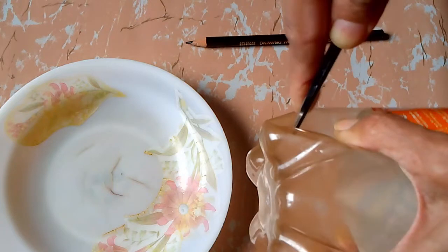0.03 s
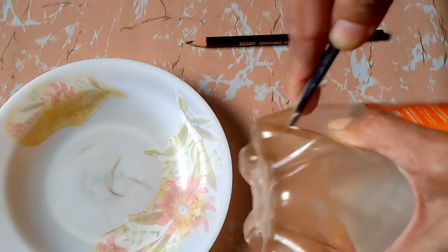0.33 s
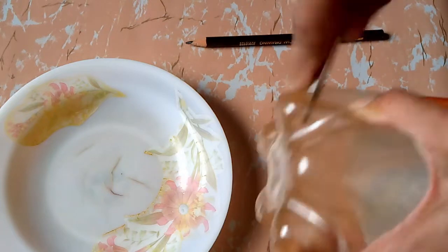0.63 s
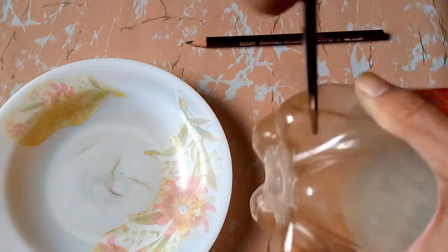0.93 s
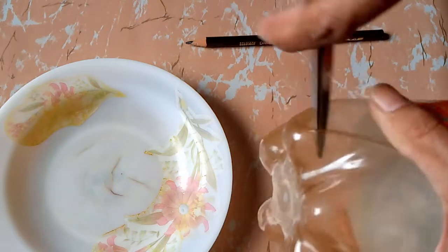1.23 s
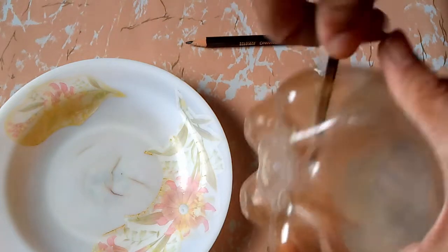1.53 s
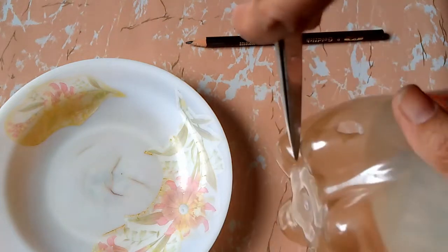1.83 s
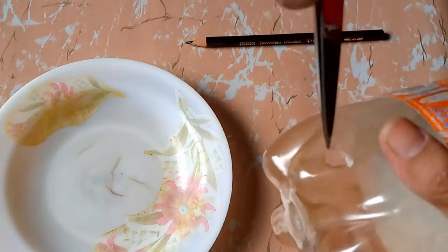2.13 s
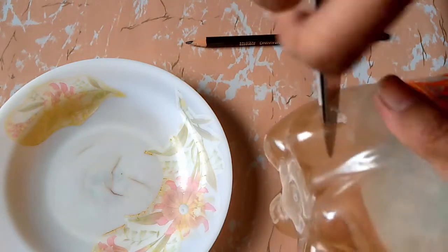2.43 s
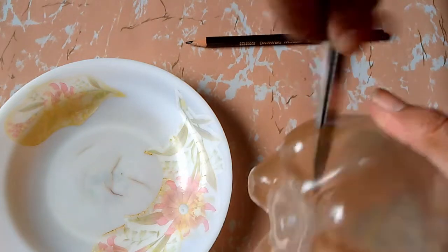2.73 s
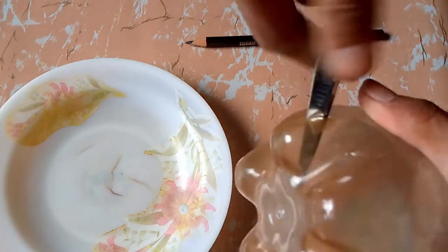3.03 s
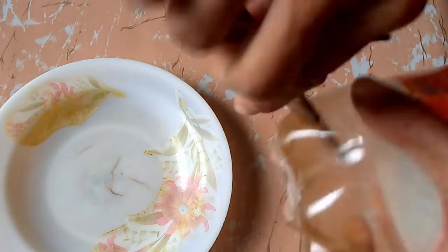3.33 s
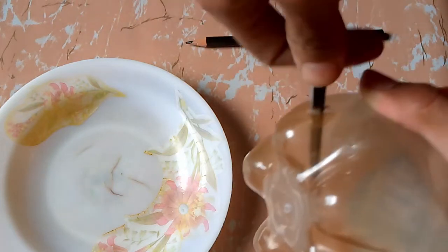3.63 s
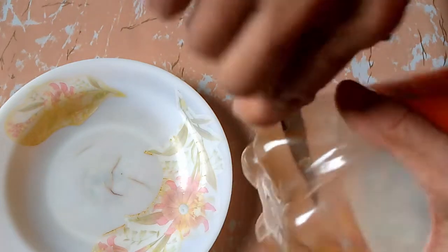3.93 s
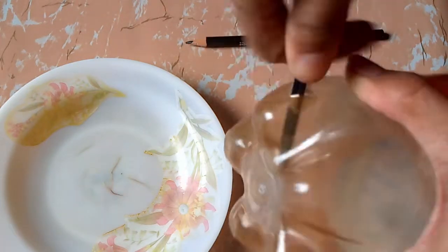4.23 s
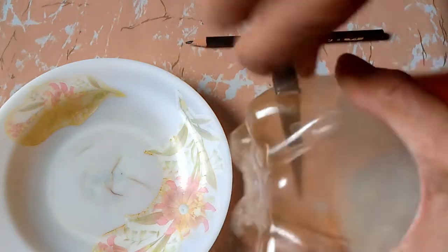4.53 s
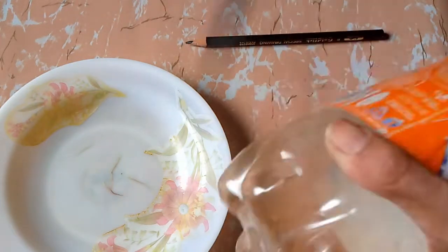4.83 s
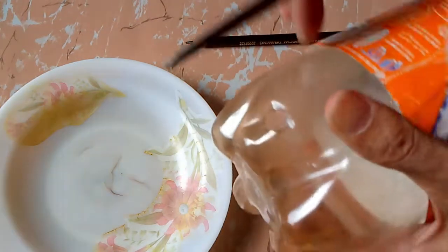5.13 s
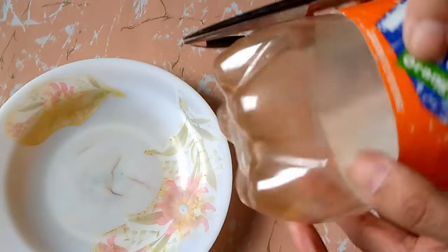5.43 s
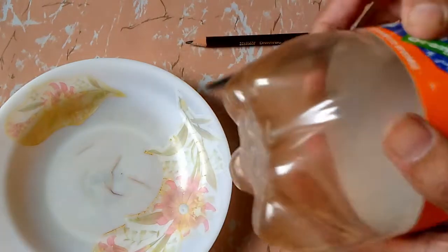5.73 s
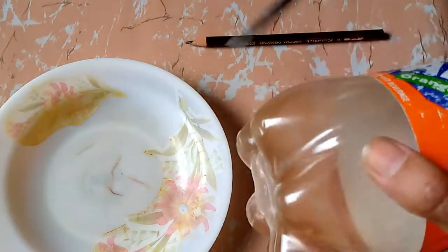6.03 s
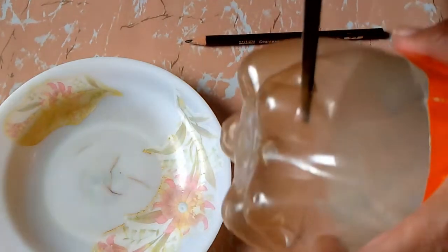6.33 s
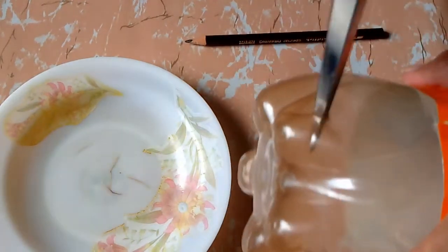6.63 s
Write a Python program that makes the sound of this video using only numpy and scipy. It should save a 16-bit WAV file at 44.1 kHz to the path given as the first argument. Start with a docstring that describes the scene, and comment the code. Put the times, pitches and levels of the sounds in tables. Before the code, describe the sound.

Small scissors work into a thin plastic bottle, close up in a small room with a little echo and a quiet hush. At about 0.5 and 0.9 seconds the point breaks through with loud snaps and hollow pops, with smaller cracks between. A rising scrape ends in two more snaps around 1.5 seconds. From 1.8 to 3 seconds the blade rubs more softly, with tiny squeaks, dull finger bumps and one firmer push near 2.8. From about 3.2 to 4.8 seconds it twists to and fro in the hole, giving roughly five short rasps mixed with clicks and knocks. After 5 seconds things are quieter: the bottle crinkles as it is turned and the free blades tick lightly. A faint, distant whine rises from about 5.5 seconds. A small pop comes at 6.2, the sound drops out briefly at 6.3, and a last crinkle and knock follow.

```python
"""In a small room, over a table, small scissors are worked into a thin plastic bottle.
The point breaks through with a few loud snaps, then the blades twist and scrape in the hole.
Snaps and scrapes shake the air inside, the wall, the crackling skin and the cut edge.
Panels pop, fingers bump, and the free blades tick, mostly near the end. Behind it all are a quiet
hush and, late on, a faint far-off whine. Just before the end the sound drops out briefly."""
import sys
import numpy as np
from scipy import signal
from scipy.fft import rfft, irfft, next_fast_len
from scipy.io import wavfile
from scipy.ndimage import uniform_filter1d

SR = 44100
rng = np.random.default_rng(int(sys.argv[2]) if len(sys.argv) > 2 else 0)


def inscribe(sig):
    """Save sig as 16-bit PCM at rate SR to the path in sys.argv[1].

    A 1-D sig is mono; a 2-D sig holds one channel per row.
    Samples are clipped to [-1, 1] before scaling.
    """
    pcm = np.round(np.clip(np.atleast_2d(sig).T, -1, 1) * 32767)
    wavfile.write(sys.argv[1], SR, pcm.astype(np.int16))


N = 294147
TIME = np.arange(N) / SR
RING = round(.25 * SR)   # samples given to one hit

# The air in the bottle and its slowest flexing.
# Each row: pitch in Hz, level in dB, fade time (t60: seconds to fall by 60 dB).
CAVITY = [(128, -9, 0.037), (165, -3, 0.056), (208.2, -2.5, 0.16), (225, -2, 0.02), (271, -6.5, 0.096)]
# The tone of the crackling skin and bright cut edge. Each row: frequency in Hz, level in dB.
SKIN = [(600, -14), (1100, -2.5), (1350, 0), (1600, -1.5), (1870, 2), (2250, -2), (2640, 1), (3100, -4),
        (3650, -9), (4200, -14), (5500, -20.5), (9000, -37.5), (16000, -54.5)]
EDGE = [(2000, -21.5), (3600, -3), (4400, 2), (5400, 0.5), (6600, 4), (7600, -5.5), (9000, -5.5),
        (10500, -20.5), (13000, -32.5), (15100, -13), (16500, -24.5)]   # the dip at 13 kHz and the peak near 15 kHz are the microphone's colour


def snaps(catch_sharp_db=-13.5):
    """The plastic buckles or tears, or the blade catches in the hole: all four bottle parts ring."""
    # Each row: start in seconds, level in dB, sharpness (edge over wall) in dB, wall pitch in Hz.
    tears = [(0.307, -69, 17.5, 790), (0.323, -60.5, -1, 890), (0.473, -68, 15, 780),
             (0.4982, -26.5, -6, 798), (0.6376, -72, 9, 790), (0.694, -76, 17.5, 780), (.746, -65, 1, 783),
             (0.793, -27.5, -22, 764), (0.8157, -35.5, -25, 780), (0.911, -23.5, -20, 774),
             (1.216, -70, 10, 790), (1.245, -65.5, 4.5, 800), (1.319, -52.5, 8.5, 750),
             (1.385, -42.5, 11.5, 754), (1.4011, -29.5, 2, 665), (1.4994, -31, -1, 766),
             (1.822, -41, -10.5, 808), (2.0826, -67, 1, 790), (2.1716, -62.5, 9, 792),
             (2.9587, -86.5, 21.5, 798), (3.2221, -44.5, -12, 750), (3.2658, -48.5, -8.5, 820),
             (3.3222, -51, 2, 810), (4.0418, -42, -13, 767), (4.056, -56, -6, 794), (4.138, -48, -9.5, 798),
             (4.2413, -76, 13, 817), (4.2614, -58.5, -3.5, 798), (5.0555, -76.5, 14, 788),
             (5.079, -74.5, 12, 787), (5.185, -63, 5, 620), (5.2123, -54, -4, 810), (5.4128, -61.5, 3, 807),
             (5.7325, -56, 1, 713), (6.198, -48.5, -4, 730), (6.2728, -61, -6, 786),
             (6.549, -65.5, 8.5, 793)]
    # Dull knocks on the lip of the hole. Each row: start in seconds, level in dB, wall pitch in Hz.
    catches = [(1.182, -47.5, 680), (1.95, -60, 798.6), (2.2415, -47, 802), (3.309, -44, 845),
               (3.442, -44, 723), (3.4565, -39, 820), (3.771, -46, 770), (4.6035, -42.5, 725),
               (5.277, -56.5, 846), (5.336, -53, 808), (5.5766, -59.5, 780), (5.636, -60.5, 790),
               (5.874, -64, 857), (5.924, -62.5, 900), (5.99, -66.5, 810), (6.63, -43.5, 786)]
    snap_mix, catch_mix = (-18, -3, 0.12, -9.5), (-10.5, -13.5, -0.1, -11.5)   # see part_levels
    hits = [(s, hz, part_levels(db, sharp_db, snap_mix)) for s, db, sharp_db, hz in tears]
    hits += [(s, hz, part_levels(db, catch_sharp_db, catch_mix)) for s, db, hz in catches]
    out = np.zeros(N)
    for s, hz, (cavity_db, wall_db, skin_db, edge_db, firm_db) in hits:
        add(out, s, from_db(cavity_db) * struck(CAVITY, detune=0.032))
        add(out, s, from_db(wall_db) * wall(firm_db, hz))
        skin = crack(SKIN, t60=0.017, flutter_db=-15.5, flutter_t60=0.1, lowest_hz=720)
        edge = crack(EDGE, t60=0.016, flutter_db=-10.5, flutter_t60=0.053)
        add(out, s, from_db(skin_db) * skin + from_db(edge_db) * edge)
    return out


def part_levels(level_db, sharp_db, mix):
    """Share out one contact: dB for the cavity, wall, skin and cut edge, then for its firmness."""
    cavity_db, skin_db, skin_sharp_share, firm_db = mix
    return level_db + np.array([cavity_db, 0, skin_db + skin_sharp_share * sharp_db, sharp_db, firm_db])


def wall(firm_db, ring_hz=790):
    """A light touch rings mainly the stiff base near 800 Hz; a firm one bends the soft panels too."""
    # The ways the wall bends. Each row: pitch in Hz, level in dB, fade time in seconds.
    bends = [(295, -7, .045), (341, -4.5, 0.063), (403, -4, 0.037), (476, -7.5, 0.029), (530, -6, 0.012),
             (666.5, 0.5, 0.023), (756, 2, 0.034), (798.2, 0, 0.07), (807, -2.5, 0.03)]
    panel_cut_db = np.clip(-47 - firm_db, 0, 19)
    # The grip shifts every pitch; the soft panels are the rows below 690 Hz.
    modes = [(hz * ring_hz / 790, db - panel_cut_db * (hz < 690), t60) for hz, db, t60 in bends]
    band = signal.butter(5, [210, 980], "band", fs=SR, output="sos")
    return unit_attack(signal.sosfilt(band, struck(modes, detune=.025, size=RING // 3)))


def crack(spectrum, t60, flutter_db, flutter_t60, lowest_hz=850):
    """Countless close tones blur into noise: a sharp burst, then a weaker flutter of the thin shell."""
    size = RING // 3
    envelope = fade(t60, size) + from_db(flutter_db) * fade(flutter_t60, size)
    return unit_attack(high_pass(shaped_noise(spectrum, size) * envelope, lowest_hz, order=2))


def struck(modes, detune, size=RING):
    """A body's own tones (modes) start together; contact spot and grip vary their level and pitch."""
    out = np.zeros(size)
    for hz, db, t60 in modes:
        strength_db, shift = rng.normal(0, [2, detune])
        out += from_db(db + strength_db) * ringing(hz * (1 + shift), t60, size)
    return unit_attack(out)


def pops(cavity_db=-13):
    """A whole panel flips: one low knock, then the empty bottle hums on."""
    # Each row: start in seconds, knock level in dB, pitch in Hz, fade time in seconds, hum level in dB.
    flips = [(0.4985, -33, 180, 0.04, -36.5), (0.756, -46, 310, 0.033, -45.5),
             (0.9085, -27, 168.2, 0.12, -29.5), (1.5003, -35, 362, 0.11, -54),
             (3.323, -42, 437, 0.048, -46.5), (4.305, -44.5, 201.7, 0.38, -55),
             (6.1965, -44, 209.7, 0.3, -65.5)]
    # The bottle's long ring. Each row: pitch in Hz, level in dB, fade time in seconds.
    hum = [(163, -4, 0.2), (206, -5, 0.42), (232, -3, 0.089), (279, -5.5, 0.16), (310, -10, 0.22),
           (800, -16, 0.2)]
    swell = 1 - fade(0.0056, RING)
    out = np.zeros(N)
    for s, knock_db, hz, t60, hum_db in flips:
        add(out, s, from_db(knock_db) * unit_attack(ringing(hz, t60) * swell))
        add(out, s, from_db(knock_db + cavity_db) * struck(CAVITY, detune=0.04))
        for mode_hz, db, mode_t60 in hum:
            add(out, s, from_db(hum_db + db) * ringing(mode_hz, mode_t60, size=SR))
    return out


def scraping(top_hz=12000):
    """The blade rasps in dense jerks; under the fingers the shell crinkles in sparser ones."""
    # Each row: firmest moment in seconds, length in seconds, level in dB, sharpness in dB.
    sawing = [(3.457, 0.2, -44, -14.5), (3.749, .15, -43.5, -13), (4.029, .19, -45, -11),
              (4.305, .2, -44, -8.5), (4.594, 0.22, -44, -10)]   # the blade goes to and fro
    pushes = [(1.358, 0.073, -39.5, 7), (1.636, 0.11, -43.5, 5.5), (2.825, .1, -40, 0),
              (3.427, 0.059, -49, -1.5), (3.768, 0.033, -50.5, -4), (4.339, 0.044, -55, 2.5),
              (4.781, 0.06, -54.5, 11.5), (4.824, 0.027, -49.5, 11.5)]   # the point presses ever harder until the plastic yields
    # The first two rows are a bright echo dying away at the start; the rest are blade slides.
    echo_and_rubs = [(0.011, 0.1, -50.5, 7.5), (0.061, 0.33, -62, 6.5), (0.566, 0.054, -49, -14.5),
                     (0.655, 0.072, -56.5, 0), (0.873, 0.022, -60, 12), (1.283, 0.12, -54.5, -1),
                     (1.333, .06, -44, 2), (1.37, 0.026, -37, 4), (1.43, 0.091, -52, 7),
                     (1.565, 0.13, -47.5, -26), (1.663, 0.058, -52.5, 6.5), (1.891, 0.043, -54.5, -11),
                     (2.2, 0.03, -60, 5), (2.332, 0.044, -58, -20), (2.405, 0.14, -59.5, 0.5),
                     (2.476, 0.043, -56, -2), (2.537, 0.057, -57.5, -3.5), (2.622, 0.18, -58.5, -4),
                     (2.738, .06, -54, -21), (3.017, 0.053, -59, -5), (3.093, 0.09, -64.5, -19),
                     (3.166, 0.093, -52, -8.5), (3.214, 0.037, -44, -9), (3.257, 0.071, -48, -9.5),
                     (3.343, 0.078, -50, -6.5), (3.526, 0.058, -43.5, -5), (3.718, .025, -38, -15),
                     (3.805, .02, -46, -22), (4.022, 0.023, -42, -5), (4.095, .06, -53, -9),
                     (4.175, 0.036, -54, -16), (4.645, 0.065, -50, -9), (3.865, 0.033, -51.5, -16.5),
                     (4.275, 0.064, -49, -17), (4.547, 0.042, -45, -14)]
    handling = [(5.304, 0.087, -61.5, 3), (5.433, 0.071, -66.5, 4.5), (5.581, 0.35, -69, -1),
                (5.854, 0.072, -71, 7), (5.927, .06, -65.5, 4), (5.982, 0.041, -67.5, 8),
                (6.594, 0.17, -59.5, -4.5)]   # the fingers turn the bottle
    rasp = dict(per_s=1100, spread_db=3, smooth_db=-8.5)
    slide = dict(per_s=1800, spread_db=2.5, smooth_db=-2.5)
    crinkle = dict(per_s=900, spread_db=4.5, smooth_db=-4)
    # Each row: the moves, their friction, their mix for part_levels, the shape of a stroke.
    kinds = [(sawing, rasp, (-14.5, -5, 0.36, 6), dict(peak_share=.23, rise_db=10.5, sag_db=18.5)),
             (pushes, slide, (-11, -3.5, 0.83, -5), dict(peak_share=.9, rise_db=22.5, sag_db=6.5)),
             (echo_and_rubs, slide, (-8, -1.5, 1.35, 1.5), dict(peak_share=.28, rise_db=3, sag_db=13.5)),
             (handling, crinkle, (-4, 0, 0.8, 12), dict(peak_share=.21, rise_db=0, sag_db=9))]
    moves = [(stroke(s, length, **shape), part_levels(db, sharp_db, mix), friction)
             for rows, friction, mix, shape in kinds for s, length, db, sharp_db in rows]
    out = np.zeros(N)
    for (start, effort), (cavity_db, wall_db, skin_db, edge_db, firm_db), friction in moves:
        force = effort * stick_slip(len(effort), **friction)
        bite = force * effort ** 0.42   # the treble grows faster than the force
        add(out, start, from_db(cavity_db) * rubbed(force, struck(CAVITY, detune=0.033)))
        add(out, start, from_db(wall_db) * travelling(force, wall, firm_db))
        skin = travelling(bite, crack, SKIN, t60=.0068, flutter_db=-13, flutter_t60=.12, lowest_hz=1050)
        edge = travelling(bite, crack, EDGE, t60=.006, flutter_db=-18, flutter_t60=.14)
        add(out, start, from_db(skin_db) * skin + from_db(edge_db) * edge)
    # Sliding is softer than snapping: the highest treble is weaker.
    return signal.sosfilt(signal.butter(2, top_hz, fs=SR, output="sos"), out)


def stroke(s, length, peak_share, rise_db, sag_db, touch_s=0.019, wobble_db=2, wobble_hz=40):
    """An unsteady hand takes hold, pushes, sags and lets go. Gives the start time and the effort."""
    start = s - peak_share * length
    times = TIME[max(int(start * SR), 0):int((start + length + touch_s) * SR)]
    age = times - start
    db = np.interp(age / length, [0, peak_share, 1], [-rise_db, 0, -sag_db])
    db += wobble_db * wander(age * wobble_hz, points=32)
    contact = np.clip(np.minimum(age, length + touch_s - age) / touch_s, 0, 1)
    return times[0], from_db(db) * contact


def stick_slip(size, per_s=1100, spread_db=3, smooth_db=-8.5, clump_db=2, clumps_per_s=160):
    """Surfaces stick and slip: tiny uneven jerks, bunched into clumps, over smooth sliding."""
    strengths = from_db(spread_db * np.minimum(rng.exponential(1, size), 4))
    directions = rng.choice([-1, 1], size)
    jerks = strengths * directions * (rng.random(size) < per_s / SR)
    clumps = from_db(clump_db * wander(TIME[:size] * clumps_per_s, points=128))
    sliding = from_db(smooth_db) * rng.standard_normal(size)
    return unit_rms(clumps * (unit_rms(jerks) + sliding))


def rubbed(force, response):
    """Friction rings one part of the bottle; the sound has the same energy as the force."""
    sound = signal.fftconvolve(force, response)
    return sound * np.linalg.norm(force) / (np.linalg.norm(sound) + 1e-20)


def travelling(force, part, *args, **settings):
    """The contact moves to a new spot every 30 ms, and each spot rings in its own way."""
    spot = round(.03 * SR)
    out = np.zeros(len(force) + RING)
    for start in range(0, len(force), spot):
        sound = rubbed(force[start:start + spot], part(*args, **settings))
        out[start:start + len(sound)] += sound
    return out


def squeaks():
    """The blade drags on the lip of the hole and one narrow tone sings out."""
    # Each row: firmest moment and length in seconds, level in dB, pitch in Hz, fade time in seconds.
    drags = [(1.836, 0.075, -61, 1745, 0.025), (2.374, 0.085, -61.5, 2100, 0.016),
             (2.414, 0.07, -59, 2400, 0.033)]
    out = np.zeros(N)
    for s, length, db, hz, t60 in drags:
        start, effort = stroke(s, length, peak_share=0.34, rise_db=2, sag_db=1)
        force = effort * stick_slip(len(effort))
        add(out, start, from_db(db) * rubbed(force, np.gradient(ringing(hz, t60))))
    return out


def blades(click_db=5, click_t60=0.014, graze_s=0.002):
    """Steel grazes steel: a bright click and a faint ring."""
    # Each row: start in seconds, level in dB.
    ticks = [(0.4263, -59.5), (2.0838, -70), (4.958, -56.5), (5.187, -65), (5.8728, -68), (5.908, -56.5),
             (5.961, -63.5), (6.0309, -54.5)]
    # The tones of the scissors. Each row: pitch in Hz, level in dB, fade time in seconds.
    steel = [(4888, -23.5, 0.055), (6560, -2, 0.06), (8300, -2.5, 0.017), (9100, -5, .03),
             (10450, -9.5, 0.017), (12600, -8.5, 0.016), (15930, -10, .015)]
    envelope = fade(click_t60, RING) * np.minimum(TIME[:RING] / graze_s, 1)
    out = np.zeros(N)
    for s, db in ticks:
        click = unit_attack(high_pass(rng.standard_normal(RING) * envelope, 5700, order=2))
        ring = struck(steel, detune=0.0057)
        add(out, s, from_db(db) * unit_attack(ring + from_db(click_db) * click))
    return out


def bumps(t60=0.048, rise_s=0.006):
    """Soft fingertips land on the bottle: dull thuds with no click."""
    # Each row: start in seconds, level in dB, pitch in Hz.
    touches = [(0.648, -43.5, 330), (1.553, -44, 215), (2.2, -57.5, 209), (2.466, -50.5, 201),
               (2.537, -48.5, 202), (2.812, -43.5, 219), (2.926, -58, 158), (5.271, -52.5, 370),
               (5.344, -58.5, 109), (5.63, -61.5, 139), (5.73, -68, 476)]
    out = np.zeros(N)
    for s, db, hz in touches:
        add(out, s, from_db(db) * ringing(hz, t60) * (TIME[:RING] / rise_s) ** 2)
    return out


def whine(waver=0.0321):
    """A faint, wavering tone far away rises and levels off."""
    # Each row: time in seconds, base pitch in Hz, level in dB.
    glide = [(5.4, 478, -82), (5.8, 548, -58), (6.05, 625, -61), (6.301, 646, -69.5)]
    # Only these overtones sound. Each row: multiple of the base pitch, level in dB.
    overtones = [(2, 0.5), (3, -2)]
    s, hz, db = np.transpose(glide)
    unsteady = 1 + waver * wander(TIME * 200, points=1400)
    phase = 2 * np.pi * np.cumsum(np.interp(TIME, s, hz) * unsteady) / SR
    level = np.interp(TIME, s, from_db(db), left=0, right=0)
    return level * sum(from_db(tone_db) * np.sin(k * phase) for k, tone_db in overtones)


def room(x, build_s=0.0011):
    """Echoes from bare walls build up quickly, and each octave dies away at its own speed."""
    # Each row: frequency in Hz, fade time in seconds.
    fade_times = [(150, .75), (500, .62), (1500, .64), (3000, .62), (6000, .52), (10000, .36), (15000, .26)]
    # Each row: frequency in Hz, echo level in dB.
    echo_levels = [(150, -9), (400, -10), (800, -18), (1500, -12), (3000, -12), (6500, -11.5),
                   (10000, -11.5), (15000, -14.5)]
    tail, edges = np.zeros(SR), np.geomspace(70, 18000, 9)
    build_up = 1 - np.exp(-(TIME[:SR] / build_s) ** 2)
    for low, high in zip(edges, edges[1:]):
        hz = np.sqrt(low * high)
        shape = fade(at_hz(fade_times, hz), SR) * build_up
        octave = signal.butter(2, [low, high], "band", fs=SR, output="sos")
        noise = signal.sosfilt(octave, rng.standard_normal(SR))
        tail += from_db(at_hz(echo_levels, hz)) * noise * shape / np.linalg.norm(shape)
    return signal.fftconvolve(x, tail)[:N]


def hush(level_db=-75):
    """The room's quiet, steady noise, strongest in the bass."""
    # Each row: frequency in Hz, relative level in dB.
    spectrum = [(25, -7.5), (60, 8), (110, 1.5), (250, -10), (450, -6), (800, -10), (1500, -11.5),
                (3000, -15), (7000, -16), (12000, -31.5), (16000, -32)]
    return from_db(level_db) * shaped_noise(spectrum, N)


def suppressor(x, threshold_db=-57, slope=0.47, depth_db=8):
    """Noise suppression: the quieter the sound, the more it is turned down."""
    power = uniform_filter1d(x ** 2, SR // 25, axis=-1)
    below_db = threshold_db - 10 * np.log10(np.maximum(power, 1e-14))
    return x * from_db(-np.clip(slope * below_db, 0, depth_db))


def from_db(db):
    return 10 ** (np.asarray(db) / 20)


def unit_rms(x):
    """Scale a sound to an average (rms) level of 1."""
    return x / np.sqrt(np.mean(x ** 2) + 1e-20)


def unit_attack(x):
    """Scale a hit so that its first 12 ms have an average (rms) level of 1."""
    return x / np.sqrt(np.mean(x[:round(.012 * SR)] ** 2) + 1e-20)


def at_hz(points, hz):
    """Read between the rows of a table, with octaves evenly spaced."""
    freq, value = np.transpose(points)
    return np.interp(np.log(np.maximum(hz, 1)), np.log(freq), value)


def fade(t60, size):
    """A level that falls by 60 dB every t60 seconds."""
    return from_db(-60 * TIME[:size] / t60)


def ringing(hz, t60, size=RING):
    """One pure tone dying away."""
    return fade(t60, size) * np.sin(2 * np.pi * hz * TIME[:size])


def wander(position, points):
    """A line that drifts from one random value to the next."""
    return np.interp(position, np.arange(points), rng.standard_normal(points))


def shaped_noise(spectrum, size):
    """Noise with the given balance of bass and treble."""
    length = next_fast_len(size)
    gain = from_db(at_hz(spectrum, np.fft.rfftfreq(length, 1 / SR)))
    return unit_rms(irfft(rfft(rng.standard_normal(length)) * gain, length)[:size])


def high_pass(x, hz, order):
    return signal.sosfilt(signal.butter(order, hz, "high", fs=SR, output="sos"), x)


def add(track, s, sound):
    """Mix a sound in, starting at s seconds."""
    start = max(round(s * SR), 0)
    track[start:start + len(sound)] += sound[:max(N - start, 0)]


def scene(break_s=6.32, resume_s=6.5):
    """Bottle and scissors close by, the room and its quiet hush behind."""
    near = snaps() + pops() + scraping() + squeaks() + blades()
    near = high_pass(near, 150, order=4) + bumps()   # so small a body gives off little bass
    into_room = near + whine()   # the whine arrives only as echoes
    # No echo carries across the break in the sound.
    heard = sum(part * (near + room(part * into_room)) for part in (TIME < break_s, TIME > resume_s))
    return (heard + hush())[None]


def record(dry, cutoff_hz=16500):
    """Quiet moments are turned down, the sound drops out once, and the highest treble is cut."""
    # Each row: time in seconds, volume change in dB. The first and last values hold before and after.
    drop_out = [(6.305, 4.5), (6.311, -46.5), (6.372, -38), (6.382, -6.5), (6.54, 5), (6.55, -1)]
    volume = from_db(np.interp(TIME, *np.transpose(drop_out)))
    treble_cut = signal.ellip(10, .2, 80, cutoff_hz, fs=SR, output="sos")
    return signal.sosfilt(treble_cut, suppressor(dry) * volume)


dry = scene()
out = record(dry)
inscribe(out)
```